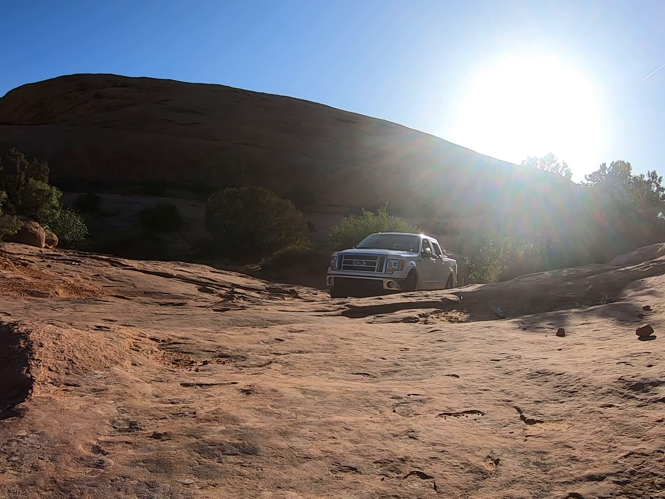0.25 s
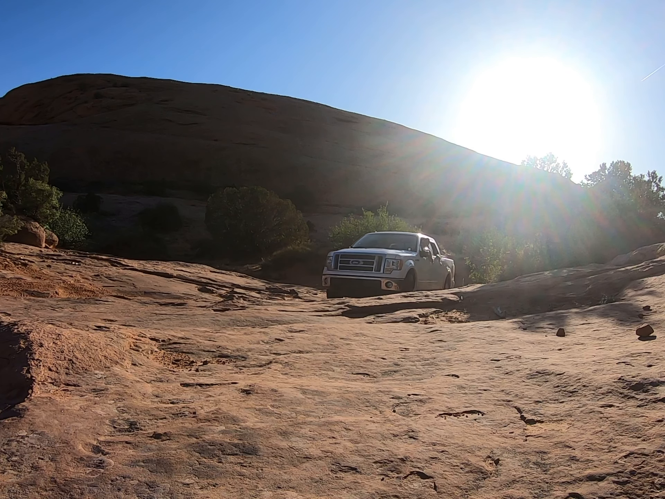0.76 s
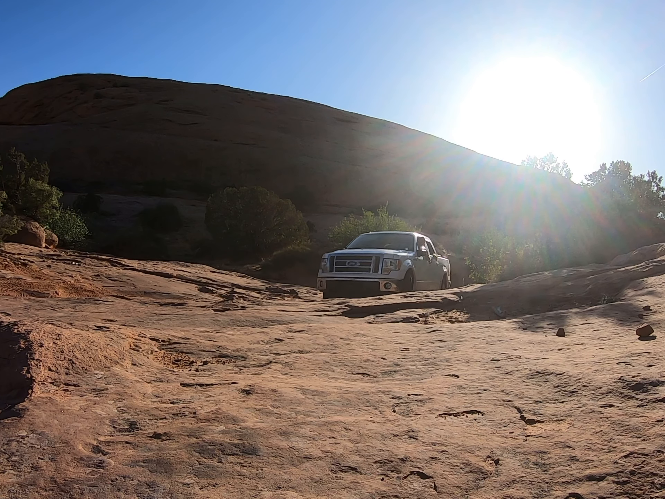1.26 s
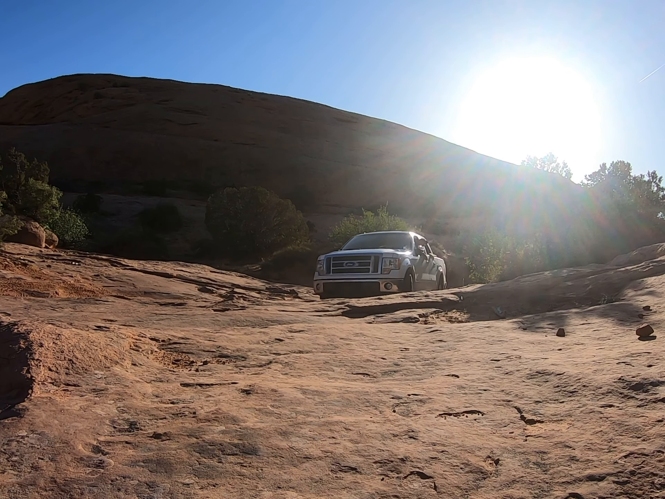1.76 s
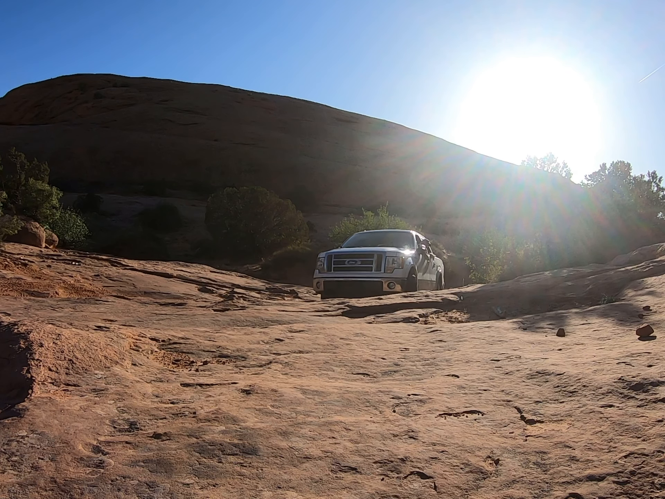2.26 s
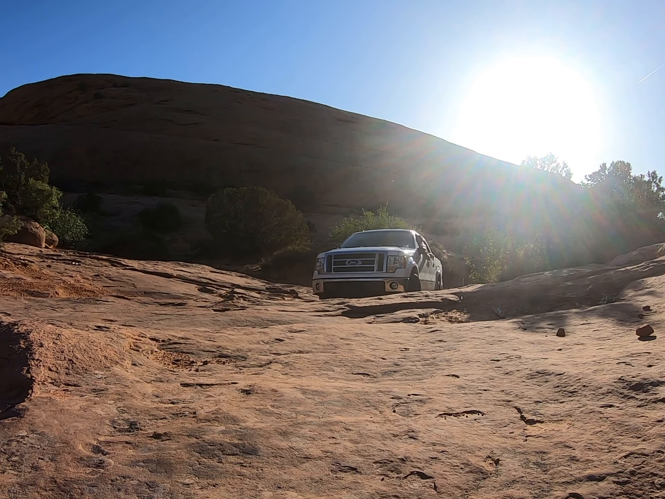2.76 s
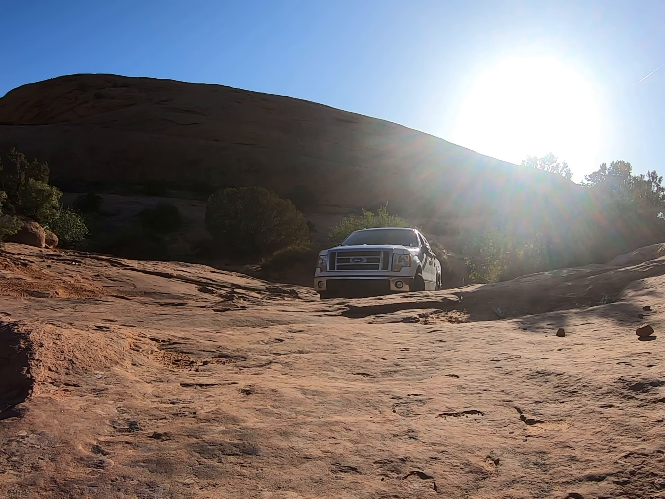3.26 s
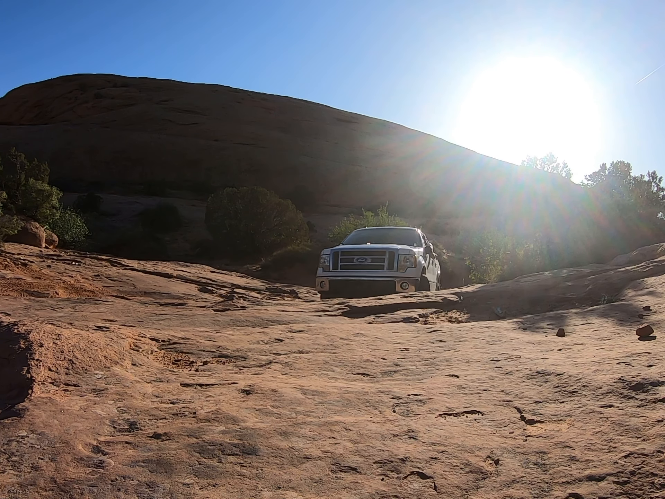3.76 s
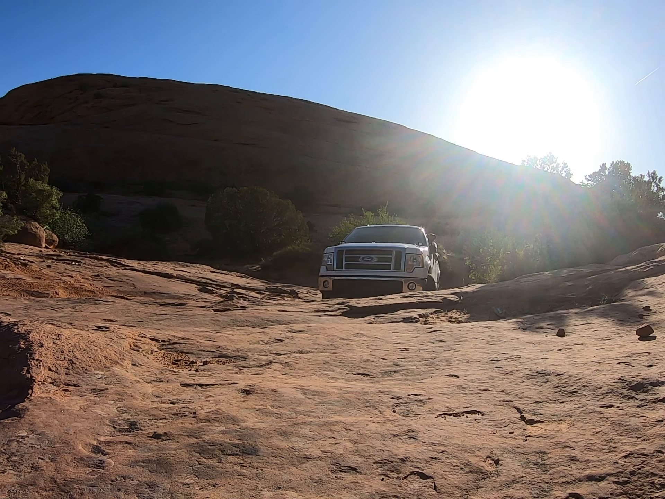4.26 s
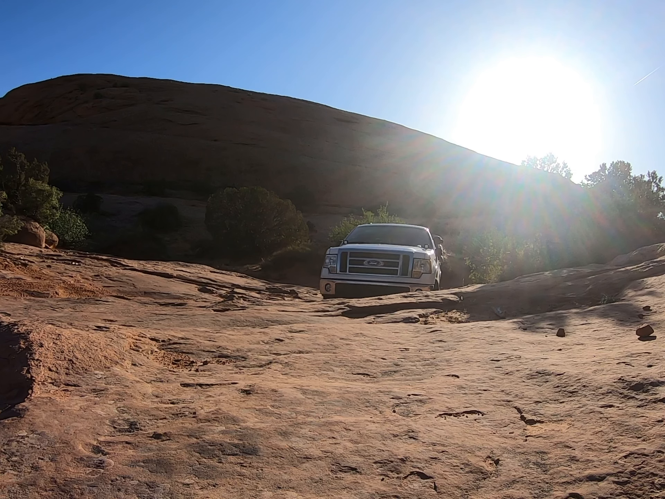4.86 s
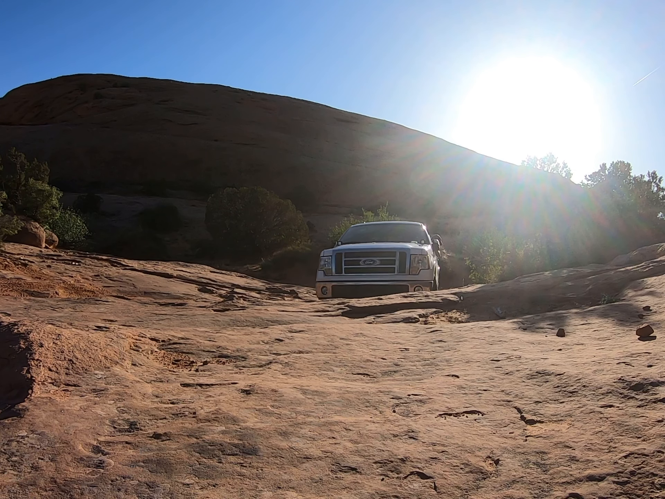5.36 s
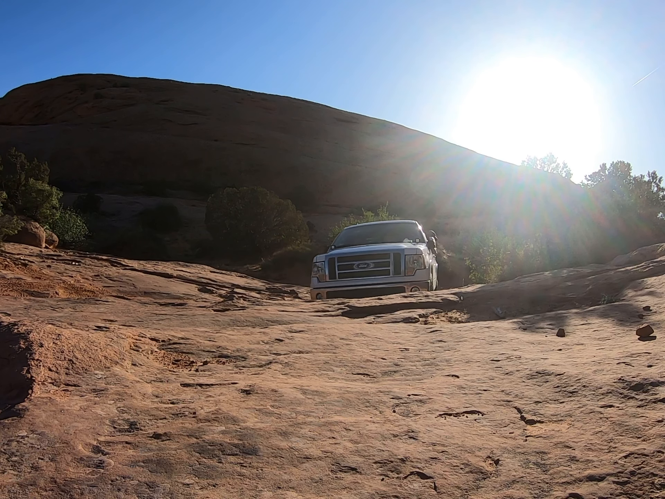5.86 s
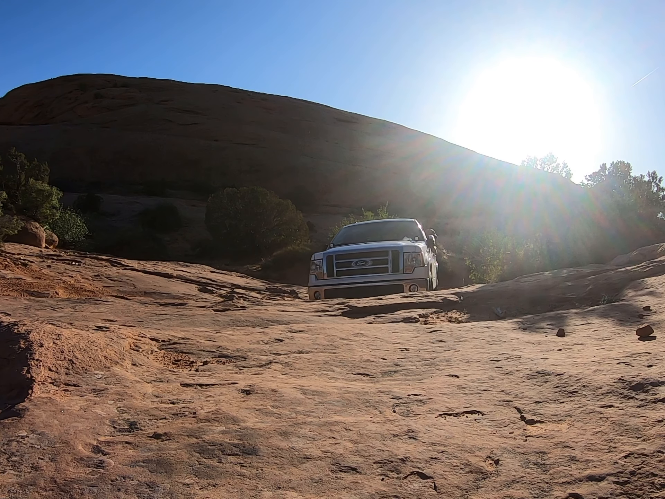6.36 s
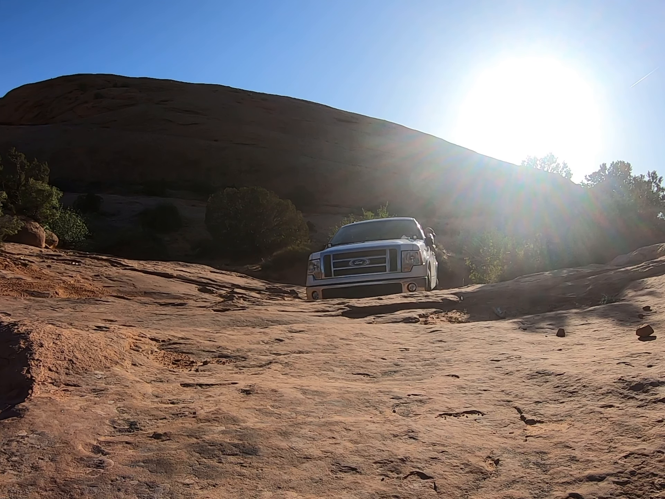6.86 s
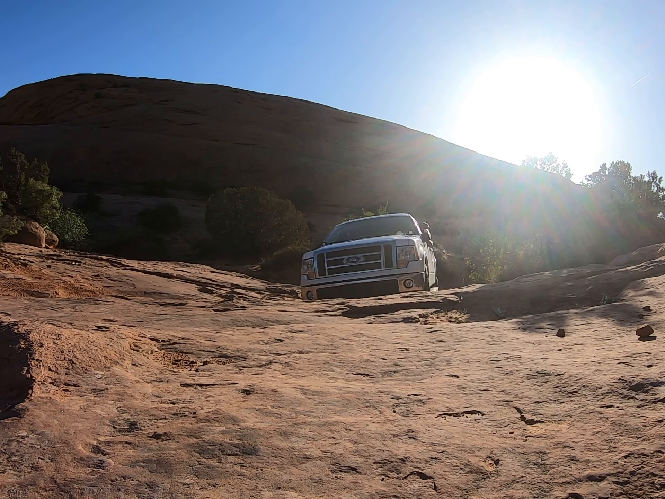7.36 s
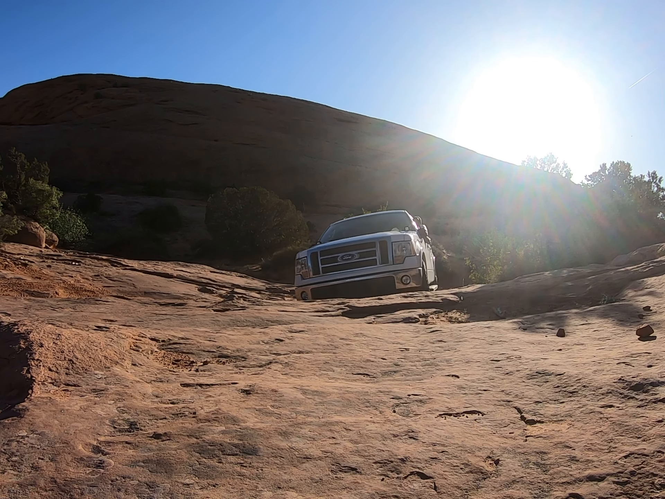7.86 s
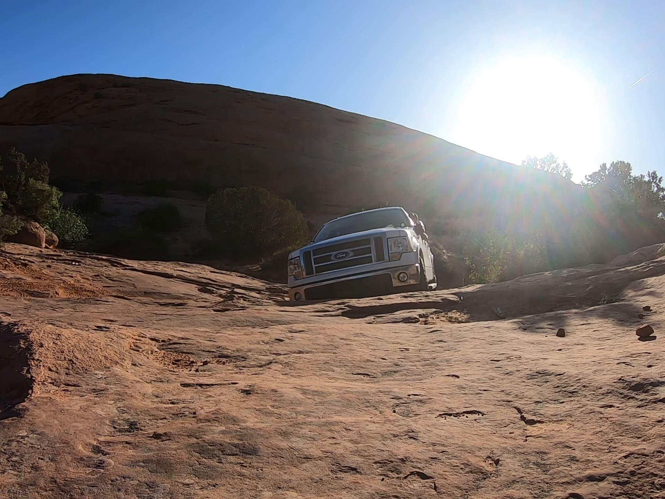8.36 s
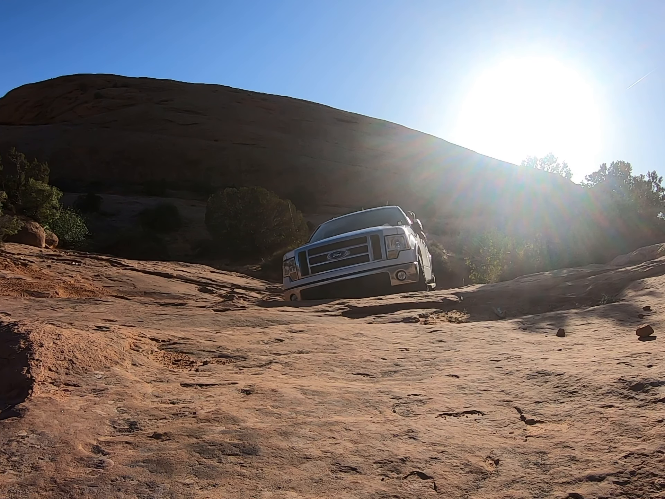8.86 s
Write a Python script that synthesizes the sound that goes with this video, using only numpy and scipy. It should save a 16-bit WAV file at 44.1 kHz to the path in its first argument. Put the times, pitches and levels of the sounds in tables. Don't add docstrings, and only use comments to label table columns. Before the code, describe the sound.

Low lumpy truck engine throbs outdoors, dips, then surges twice as it slowly nears, under steady airy fan noise and sparse sharp clicks of stone and grit.

```python
import sys
import numpy as np
from scipy import signal
from scipy.fft import rfft, irfft, next_fast_len
from scipy.io import wavfile
from scipy.ndimage import uniform_filter1d, map_coordinates

SR = 44100
rng = np.random.default_rng(int(sys.argv[2]) if len(sys.argv) > 2 else 0)


def persist_wave(psi):
    counts = np.round(np.clip(psi, -1, 1) * 32767).astype(np.int16)
    wavfile.write(sys.argv[1], SR, np.atleast_2d(counts).T)


def how_loud(loudness_db):
    steps = np.asarray(loudness_db, float) / 20
    return 10 ** steps


N = 402633


def unit(x):
    return x / np.sqrt(np.mean(x ** 2) + 1e-20)


def along(points, hz):
    point_hz, value = np.transpose(points)
    return np.interp(np.log(hz + 1), np.log(point_hz + 1), value)


def over_time(rows):
    time_s, value = np.transpose(rows)
    return np.interp(np.arange(N) / SR, time_s, value)


def wobble(knots_per_s):
    knots = rng.standard_normal(int(N * knots_per_s / SR) + 4)
    return map_coordinates(knots, [np.arange(N) * knots_per_s / SR])


def filtered(x, response):
    size = 2 * next_fast_len(N // 2 + SR // 2)
    spectrum = rfft(x, size) * response(np.fft.rfftfreq(size, 1 / SR))
    return irfft(spectrum, size)[..., :N]


def causal(points):
    def response(hz):
        cepstrum = irfft(np.log(how_loud(along(points, hz))))
        cepstrum[1:len(hz) - 1] *= 2
        cepstrum[len(hz):] = 0
        return np.exp(rfft(cepstrum))
    return response


# pitch_hz, side_minus_mid_db
PORT_DIFFERENCE = [(180, -36), (310, -29), (530, -23), (910, -14.5), (1560, -22.5), (2690, -27.5),
                   (4600, -21.5), (7000, -6.5), (9000, 2), (12000, -3)]


def rush(spectrum, patchy_db):
    noise = signal.stft(rng.standard_normal((2, N)), nperseg=512)[2]
    patches = uniform_filter1d(rng.standard_normal(noise.shape[1:]), size=6, axis=0)
    patches = unit(uniform_filter1d(patches, size=14, axis=1))
    pair = signal.istft(noise * how_loud(patchy_db * patches), nperseg=512)[1][:, :N]

    def colour(hz):
        return how_loud(along(spectrum, hz) + [0 * hz, along(PORT_DIFFERENCE, hz)])
    mid, side = filtered(pair, colour)
    return np.array([mid + side, mid - side]) / np.std(mid)


# time_s, firings_per_second_hz
ENGINE_SPEED = [(0, 47.68), (.62, 44.67), (1.85, 45.66), (2.5, 34.58), (3.1, 42.67), (4.0, 51.38),
                (4.42, 52.53), (5.17, 42.93), (5.6, 46.56), (6.05, 47.23), (6.62, 64.5), (6.92, 71.06),
                (7.22, 71.67), (7.58, 56.03), (7.97, 56.7), (8.3, 59.79), (8.72, 47.57), (9.13, 47.73)]


def firing_rate():
    return over_time(ENGINE_SPEED)


# pitch_hz, level_db_per_hz
FAN_ROAR = [(190, -17), (330, 1.5), (351, -5), (383, -2.5), (671, -4), (797, -6), (928, -17), (1000, -15),
            (1300, -44.5), (2200, -120)]
# pitch_hz, level_db_per_hz
BAY_HISS = [(530, -27.5), (900, -5), (963, -3), (1290, 0.5), (1430, -3), (1710, -1), (1950, -4.5),
            (2130, -3), (2680, -5), (3360, -8), (3630, -11), (5500, -23.5), (7150, -53.5), (12100, -120)]
# pitch_hz, level_db_per_hz
GRILLE_AIR = [(4500, -33.5), (5600, -2.5), (6200, 0), (6800, 1), (7800, -2.5), (8300, -10.5), (9400, -17),
              (10100, -13), (10800, -23), (12000, -33), (13800, -46), (16000, -62)]


def engine_bay():
    start_m, crawl_m_per_s = 25.8, 0.96
    turn_s, turn_takes_s = 3.8, .3
    idle_hz = 46
    t = np.arange(N) / SR
    nearer_db = -20 * np.log10(np.maximum(1 - crawl_m_per_s * t / start_m, .1))
    facing = .5 + .5 * np.tanh((t - turn_s) / turn_takes_s)
    doublings = np.log2(firing_rate() / idle_hz)

    def level_db(far_db, approach_share, facing_db, doubling_db):
        return far_db + approach_share * nearer_db + facing_db * facing + doubling_db * doublings
    roar_db = level_db(-49, 1.57, 2, -0.7) - 2.0 + 0.89 * wobble(2.593)
    hiss_db = level_db(-53.5, 0.95, 1.22, -0.1) - 0.49 + 0.26 * wobble(9)
    air_db = level_db(-79, 1.25, 2.6, 1.5) + 1.0 + .4 * wobble(7)
    roar = how_loud(roar_db) * rush(FAN_ROAR, patchy_db=0.6)
    hiss = how_loud(hiss_db) * rush(BAY_HISS, patchy_db=0.63)
    air = how_loud(air_db) * rush(GRILLE_AIR, patchy_db=0.5)
    return roar + hiss + air


# start_s, peak_db, ring_hz, fade_by_60_db_s
STONE_KNOCKS = [(1.92, -41, 2100, .02), (1.931, -41, 1950, .02), (4.9067, -19, 1500, .004),
                (4.9066, -26, 760, .012), (4.9354, -28, 1500, .004), (5.8164, -31, 1400, .005),
                (5.8302, -30, 1300, .005), (5.83, -28, 880, .018), (5.887, -32, 800, .008),
                (7.74, -34, 295, .12), (8.6324, -26, 750, .01), (8.6406, -25, 1400, .005),
                (8.6435, -29, 600, .035)]


def stone_knocks():
    knocks, t = np.zeros(N), np.arange(SR // 5) / SR
    for start_s, peak_db, ring_hz, fade_s in STONE_KNOCKS:
        ring = np.sin(2 * np.pi * ring_hz * t) * (1 - np.exp(-t / .0004))
        knocks[round(start_s * SR):][:len(t)] += how_loud(peak_db - 60 * t / fade_s) * ring
    return knocks


# start_s, peak_db, fade_by_60_db_s, dull_above_hz
GRIT_CRACKS = [
    (0.938, -45, .04, 16080),
    (0.9452, -38.5, 0.027, 16000),
    (0.9499, -38.5, 0.053, 12000),
    (7.761, -39.5, 0.034, 6000),
    (8.634, -37, 0.037, 2500),
    (8.6373, -29.5, 0.022, 4993),
    (8.639, -35.5, 0.069, 3476),
    (8.648, -37, 0.087, 3500),
]
# pitch_hz, gain_db
GRIT_TONE = [(200, -11.5), (600, 10.5), (1500, 0), (3000, 0), (5000, -7.5), (7500, -15.5), (9000, -31),
             (13000, -29), (15000, -60.5)]


def grit_cracks():
    cracks, t = np.zeros(N), np.arange(SR // 5) / SR
    for start_s, peak_db, fade_s, dull_hz in GRIT_CRACKS:
        b, a = signal.butter(2, min(dull_hz, 20000), fs=SR)
        burst = signal.lfilter(b, a, rng.standard_normal(len(t)))
        cracks[round(start_s * SR):][:len(t)] += how_loud(peak_db + 2.0 - 60 * t / fade_s) * burst
    return filtered(cracks, causal(GRIT_TONE))


# pitch_hz, width_hz, level_db
PIPE_RINGS = [(45.9, 2.2, -1), (76.4, 9.5, 7.5), (90.4, 2.5, 11.5), (129, 4.02, 19.5), (142.3, 7, 4.5),
              (176.85, 6.8, 7), (196.6, 14.5, 5.5), (234.3, 4.5, 10.5), (267.9, 12.2, 12.5),
              (315, 4.4, -1.5), (403, 23, 12)]
# pitch_hz, gain_db
EXHAUST_TONE = [(15, -40), (30, -14.5), (37, -18), (43, -0.5), (60, -2.5), (100, -10), (160, -10),
                (210, -12.5), (245, -21.5), (290, -30.5), (450, -48), (900, -94), (1500, -140)]


def pipe_response(hz):
    uneven = np.minimum(hz / 115, 1.3) ** 2
    uneven *= 1 + 1.1 / (1 + ((hz - 131) / 9) ** 2)
    apart = np.minimum(hz / 72, 1.1)
    rushing = .055 + 1 / (1 + (215 / (hz + 1)) ** 4)
    rings = 1
    for ring_hz, width_hz, level_db in PIPE_RINGS:
        damping = 1j * hz * width_hz
        rings = rings + how_loud(level_db) * damping / (ring_hz ** 2 - hz ** 2 + damping)
    entry = np.array([1 + 0 * hz, 1j * apart, uneven, 1j * uneven, rushing])
    return entry * rings * how_loud(along(EXHAUST_TONE, hz)) * np.exp(.5j)


# time_s, throttle_db
THROTTLE = [(0, -8), (.51, -9), (.64, -2.3), (.81, -9.5), (1.05, -2.5), (1.93, -1.9), (2.05, -13.5),
            (2.55, -10.5), (3.1, -1.8), (4.1, 2.5), (5.0, -3.5), (5.75, -1.1), (6.65, 8.5), (7.12, 7.5),
            (7.36, 3.5), (8.3, 6), (8.65, 0.6), (9.13, 4)]
BANK_SIGNS = [1, -1, -1, 1, -1, 1, 1, -1]
CYLINDER_QUIRKS = [(.42, .01), (.02, -.11), (-.16, .03), (-.28, .15), (0, -.01), (-.16, -.17), (.02, -.03),
                   (.14, .13)]


def exhaust():
    throttle_db, rate_hz = over_time(THROTTLE), firing_rate()
    at = np.flatnonzero(np.diff(np.floor(np.cumsum(rate_hz) / SR)))[:-1]
    cylinder = np.arange(len(at)) % 8
    size, turn = np.transpose(CYLINDER_QUIRKS)[:, cylinder]
    burn = rng.standard_normal((len(at), 2))
    even = 1 + .045 * how_loud(-throttle_db[at]) * burn[:, 0]
    banks = how_loud(-1.5) * np.take(BANK_SIGNS, cylinder)
    jitter_ms = .15 * burn[:, 1]
    at = at + np.round(jitter_ms * SR / 1000).astype(int)
    gas = np.zeros((5, N))
    pulse_size = how_loud(throttle_db[at] - 43) * SR / rate_hz[at]
    gas[:4, at] = np.array([even, banks, size, turn]) * pulse_size
    gas[4] = how_loud(.5 * throttle_db - 5.5) * rng.standard_normal(N)
    return -filtered(gas, pipe_response).sum(axis=0)


def scene():
    surroundings = engine_bay() + stone_knocks() + grit_cracks()
    burble = exhaust()
    lean = 0.058 * filtered(burble, lambda hz: np.exp(.9j) / (1 + (hz / 70) ** 2))
    return burble - np.array([lean, -lean]) + surroundings * how_loud([[-.2], [.2]])


def roll_off(x):
    return signal.sosfilt(signal.butter(12, 13800, fs=SR, output="sos"), x)


def record(dry):
    return roll_off(dry)


dry = scene()
out = record(dry)
persist_wave(out)
```